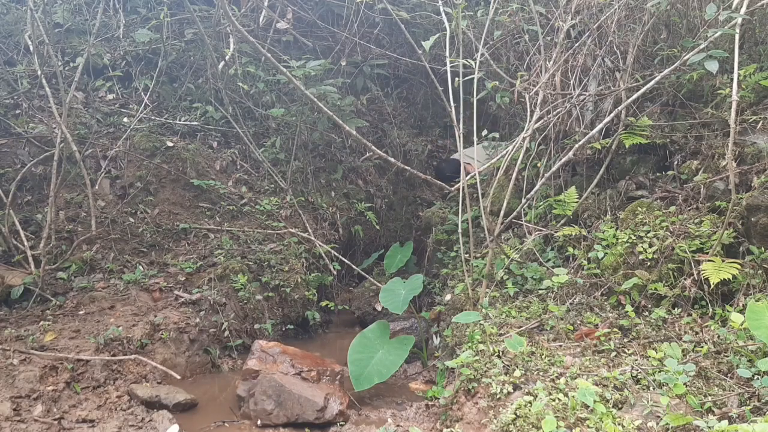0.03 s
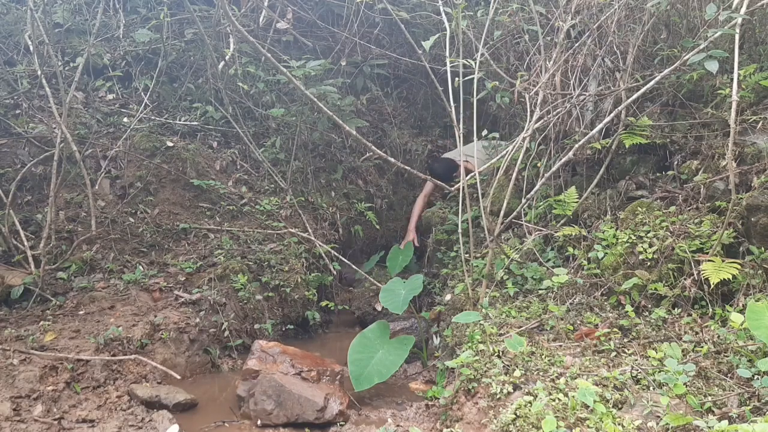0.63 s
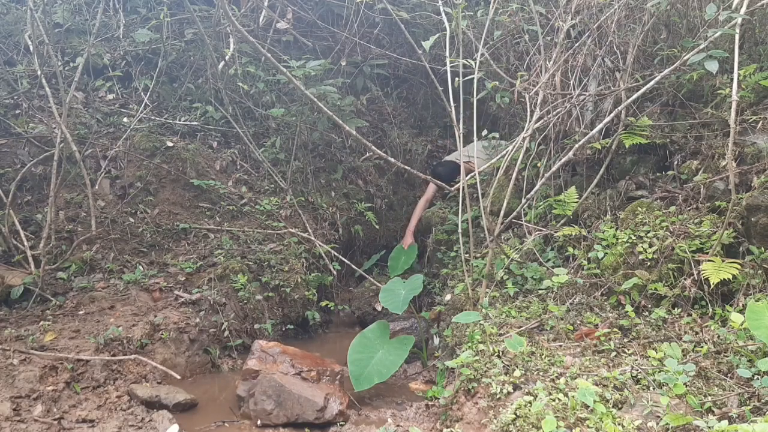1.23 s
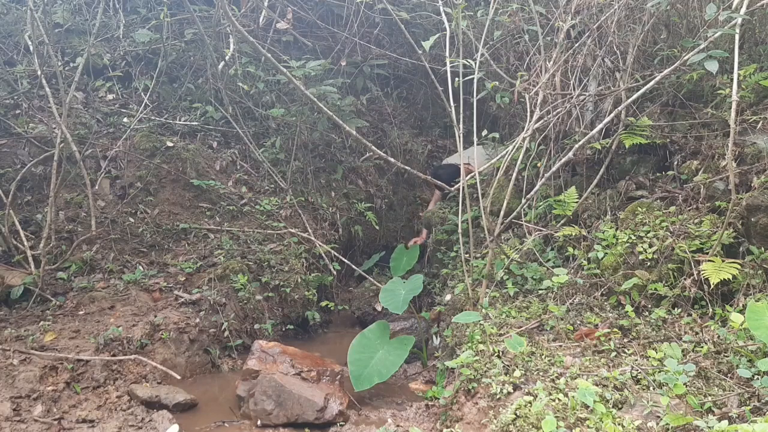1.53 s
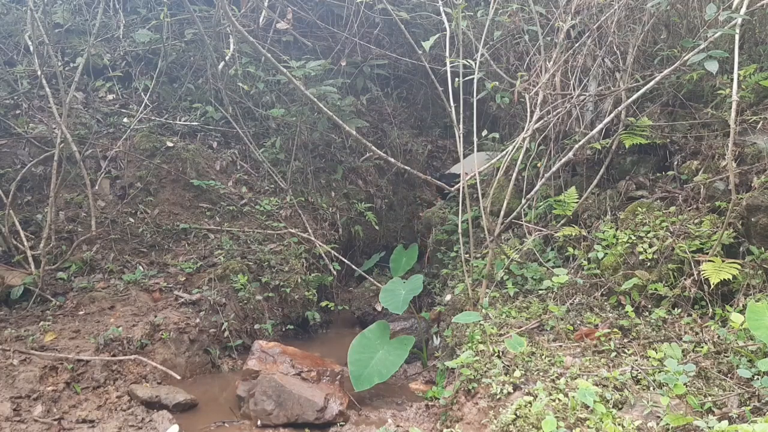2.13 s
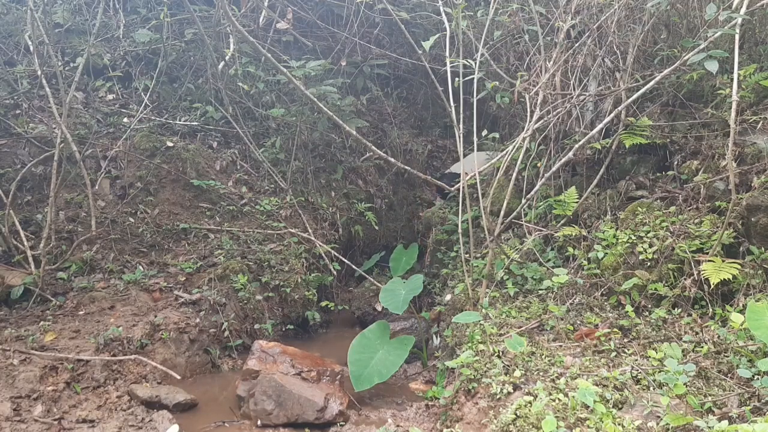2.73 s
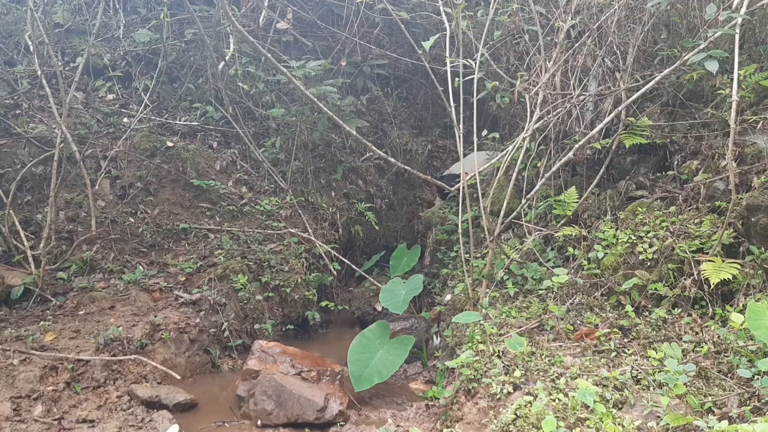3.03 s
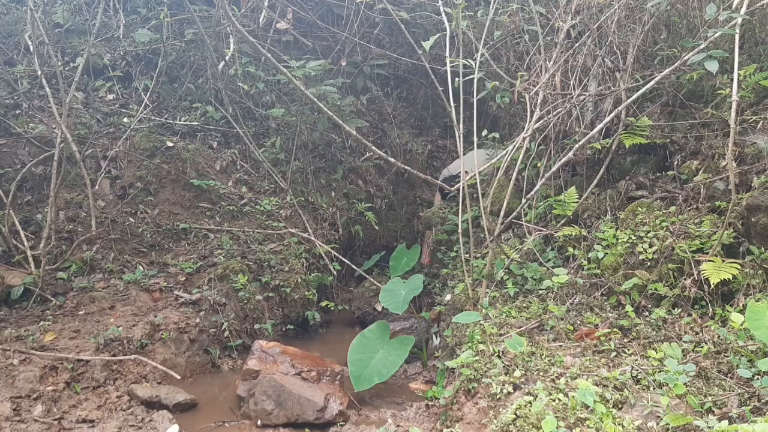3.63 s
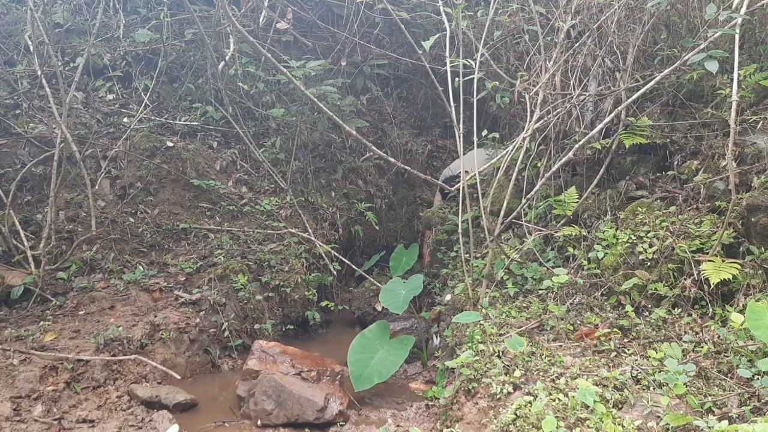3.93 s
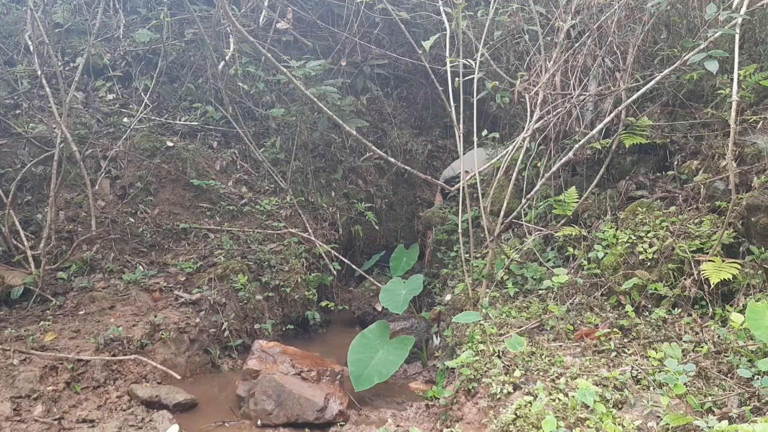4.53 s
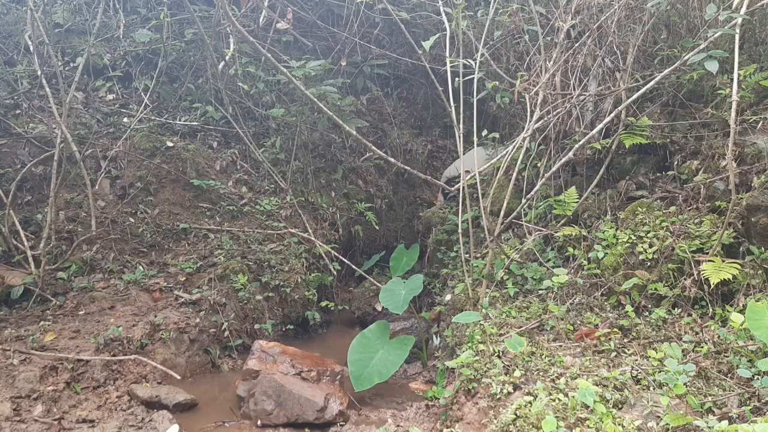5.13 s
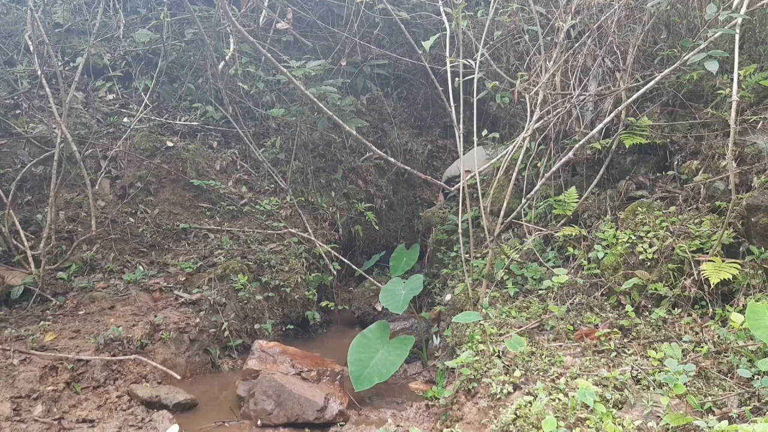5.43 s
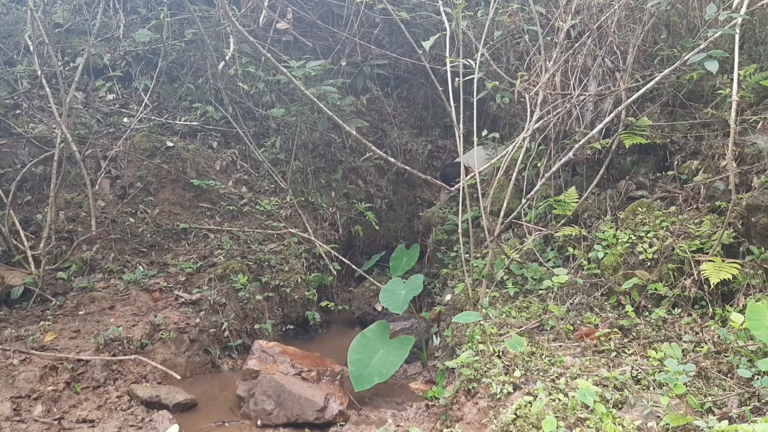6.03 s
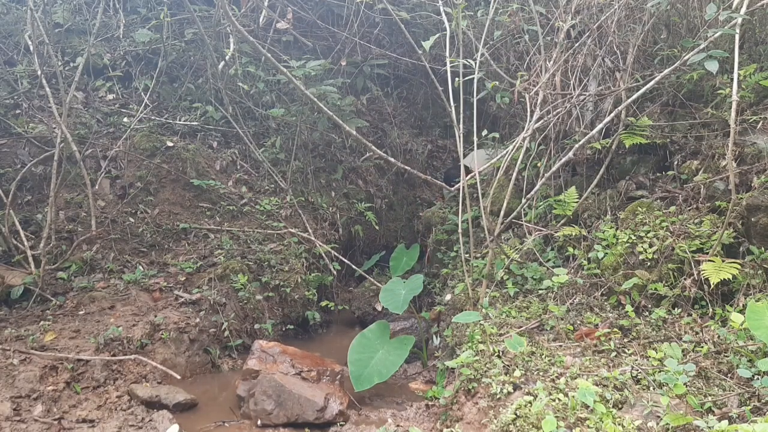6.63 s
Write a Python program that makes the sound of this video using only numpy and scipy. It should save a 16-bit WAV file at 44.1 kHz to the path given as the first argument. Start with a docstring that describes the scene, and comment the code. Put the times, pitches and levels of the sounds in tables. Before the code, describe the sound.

The sound opens in a forest gully with soft wet bumps close to the microphone. At about 0.6 and 0.8 seconds come two splashes, by far the loudest events: heavy drops thud into mud, bubbles froth, spray patters on leaves and twigs snap. The water settles by 1.4 seconds. Faint leaf brushes and twig ticks recur, around 2.3, 4.4 and 6.4 seconds.

Throughout, insects buzz high and steady over an even hiss, with rasps pulsing about four times a second and a cricket trilling in bouts. A thin brook bubbles quietly on the right, with scattered small plops. A few very faint, distant bird whistles come mostly between 1.4 and 2.2 seconds. A low, far engine drone on the right swells near 4 seconds, then rises slightly in pitch as it fades. The insects and brook continue to the end, just before 7 seconds.

```python
"""Water and wet earth splash twice among the leaves, close to the microphones, as someone reaches down.
Heavy drops thud into mud, bubbles froth and spray patters out; soft bumps and twig snaps lie around it.
The place is a forest gully: a thin brook bubbles to the right, and insects buzz and trill with their wings.
Far off, an engine drones and a few birds whistle faintly through the hiss of the forest."""
import sys
import numpy as np
from scipy import signal
from scipy.fft import rfft, irfft
from scipy.io import wavfile
from scipy.ndimage import uniform_filter1d

SR = 44100
rng = np.random.default_rng(int(sys.argv[2]) if len(sys.argv) > 2 else 0)


def unload_wav(signal):
    """Save mono or channel-first audio to the path in sys.argv[1] as 16-bit WAV at rate SR, clipped to [-1, 1]."""
    wavfile.write(
        sys.argv[1],
        SR,
        np.round(np.clip(np.atleast_2d(signal).T, -1, 1) * 32767).astype(np.int16),
    )


N = 298557
T = np.arange(N) / SR
HZ = np.fft.rfftfreq(N, 1 / SR)


def gain_of(db):
    """Decibels to amplitude."""
    return 10 ** (np.asarray(db) / 20)


def unit_rms(x):
    """Scales to rms 1."""
    return x / np.sqrt(np.mean(x ** 2) + 1e-20)


def over_frequency(points):
    """A table's value at every frequency, interpolated on a log axis."""
    hz, value = np.transpose(points)
    return np.interp(np.log(HZ + 1), np.log(hz + 1), value)


def over_time(rows):
    """A table's value at every sample."""
    return np.interp(T, *np.transpose(rows))


def colour(x, spectrum):
    """Filters x by a spectrum that falls away steeply beyond its ends; the result has rms 1."""
    low_cut = 1 + (spectrum[0][0] / (HZ + 1) / 1.2) ** 8
    high_cut = 1 + (HZ / spectrum[-1][0] / 1.2) ** 8
    return unit_rms(irfft(rfft(x) * gain_of(over_frequency(spectrum)) / high_cut / low_cut, N))


def drift(hz):
    """A random wander of rms 1, mostly slower than hz."""
    return unit_rms(irfft(rfft(rng.standard_normal(N)) * np.exp(-(HZ / hz) ** 2) * (HZ > 0), N))


def add(mix, s, sound):
    """Lays a sound into the mix at time s."""
    part = mix[max(round(s * SR), 0):][:len(sound)]
    part += sound[:len(part)]


def swells(rows, length_s):
    """An envelope that fades in and out around each (time [s], level [dB])."""
    out = np.zeros(N)
    for s, db in rows:
        add(out, s - length_s / 2, gain_of(db) * signal.windows.tukey(int(length_s * SR), .8))
    return out


def repeats(runs):
    """Spreads runs into single calls (time [s], level [dB])."""
    return [(s, db) for first, until, spacing, db in runs for s in np.arange(first, until, spacing)]


def impacts(per_s, spread_db):
    """A train of tiny impacts, most small and a few large."""
    out = np.zeros(N)
    at, size, sign = rng.random((int(per_s * N / SR), 3)).T
    out[(at * N).astype(int)] = np.sign(sign - .5) * gain_of(spread_db * np.minimum(-np.log(size), 4))
    return out


def mic_pair(x, likeness):
    """Shares two unrelated signals between the microphones, by (frequency [Hz], correlation)."""
    angle = np.arccos(np.clip(over_frequency(likeness), -1, 1)) / 2
    mid, side = rfft(x) * [np.cos(angle), np.sin(angle)]
    return irfft([mid + side, mid - side], N)


def from_right(x):
    """Sound from the right reaches the left microphone 20 samples later."""
    return np.array([np.roll(x, 20), x])


def gully(x, wet_db, t60):
    """Banks and stems scatter a short diffuse tail to each microphone."""
    t = T[:SR // 2]
    tail = rng.standard_normal((2, len(t))) * gain_of(-60 * t / t60) * (t > .003)
    return gain_of(wet_db) * signal.fftconvolve(x[None], tail / np.linalg.norm(tail[0]), axes=1)[:, :N]


# Forest hiss, all around: (frequency [Hz], relative level [dB])
AIR_SPECTRUM = [(20, -18), (80, 6.5), (200, -2.5), (400, -6), (700, -5.5), (1100, -5), (1700, -5.5),
                (2600, -4.5), (3400, -4), (4200, -.5), (5600, -3), (7200, -1), (9000, -3), (11000, -2),
                (13000, -6), (15500, -5.5)]

def forest_air():
    """An even hiss, alike at both microphones only in the bass."""
    hiss = colour(rng.standard_normal((2, N)), AIR_SPECTRUM)
    hiss = mic_pair(hiss, likeness=[(100, 0.81), (500, 0.23), (1200, 0.056), (4000, 0.0093)])
    return hiss * gain_of(-56.5 + .45 * drift(4))


# Engine speed: (time [s], firing rate [Hz])
FIRING_RATE = [(0, 61.96), (1.5, 60.3), (2.3, 61.9), (3.3, 60.96), (3.8, 61.3), (4.5, 61.44), (5.05, 63.2),
               (5.5, 65.4), (5.9, 66.1), (6.3, 68.8), (6.77, 69.2)]
# Its drone as heard, far off to the right, rising and falling and dipping deeply during the splash: (time [s],
# level [dB])
DRONE_LEVEL = [(0.0, -63), (0.07, -55.5), (0.3, -59), (0.45, -73), (0.6, -57), (0.71, -80), (1.11, -78),
               (1.28, -64.5), (1.51, -55), (1.62, -66), (1.83, -62), (2.15, -71), (2.92, -68), (3.0, -61.5),
               (3.85, -48.5), (5.35, -53), (5.47, -56.5), (6.09, -58.5), (6.11, -62.5), (6.56, -66),
               (6.6, -58), (6.77, -70)]
# Its rumble: (frequency [Hz], relative level [dB])
RUMBLE_SPECTRUM = [(20, -26), (45, -5), (70, -4), (120, 0.5), (160, -10), (260, -16), (500, -37)]

def far_engine():
    """Only the firing tone and a rumble carry this far; it runs rougher and less evenly as it speeds up."""
    firing_hz = over_time(FIRING_RATE)
    phase = 2 * np.pi * np.cumsum(firing_hz) / SR
    tone = np.sqrt(2) * (np.sin(phase) + gain_of(-20.5) * np.sin(2 * phase)) * gain_of(.5 * drift(28))
    rumble_db = -12 + 0.93 * (firing_hz - 62)
    rumble = gain_of(rumble_db) * colour(rng.standard_normal(N), RUMBLE_SPECTRUM)
    waver_db = 0.87 + 0.23 * (firing_hz - firing_hz[0])
    return from_right((tone + rumble) * gain_of(over_time(DRONE_LEVEL) + waver_db * drift(8.8)))


# Birds, far right: (time [s], length [s], start pitch [Hz], end pitch [Hz], relative level [dB])
BIRD_NOTES = [(0.263, 0.14, 1995, 1860, -71), (1.405, 0.086, 2400, 2387, -64.5),
              (1.559, 0.11, 2305, 2300, -67.5), (1.97, 0.069, 6220, 6580, -58),
              (2.12, .04, 6830, 6950, -59.5), (5.648, 0.082, 2350, 2110, -70)]

def far_birds():
    """Thin wavering whistles blurred by the trees."""
    out = np.zeros(N)
    for s, length, start_hz, end_hz, db in BIRD_NOTES:
        hz = np.linspace(start_hz, end_hz, int(length * SR))
        hz *= 1 + 0.0203 * drift(210)[:len(hz)]
        whistle = np.sin(2 * np.pi * np.cumsum(hz) / SR) * signal.windows.tukey(len(hz), .6)
        add(out, s, gain_of(db + 5.5) * whistle)
    return from_right(out) + gully(out, wet_db=-1.5, t60=0.25)


# High insect chorus, all around: (frequency [Hz], relative level [dB])
CHORUS_SPECTRUM = [(6800, -23), (7150, -11), (7500, -8), (7750, -4.5), (7930, 2.5), (8050, -9), (8250, -3),
                   (8500, -16)]
# It thins out, then returns: (time [s], level [dB])
CHORUS_SWELL = [(0, -57), (1.3, -60), (2, -71), (2.9, -65), (4, -60), (5.2, -57.5), (6.77, -57.5)]

def insect_chorus():
    """Many insects merge into one narrow band of hiss."""
    return colour(rng.standard_normal((2, N)), CHORUS_SPECTRUM) * gain_of(over_time(CHORUS_SWELL))


def wing_strokes(spectrum, throb_hz, depths):
    """Ringing wing strokes blur into a nearly even band that throbs; depths lists the throb's harmonics."""
    turns = np.cumsum(throb_hz * (1 + 0.0049 * drift(3.1))) / SR
    throb = sum(depth * np.cos(2 * np.pi * k * turns) for k, depth in enumerate(depths, 1))
    ring = colour(rng.standard_normal((2, N)), spectrum)
    strength = np.sqrt(uniform_filter1d(ring ** 2, size=1500, axis=1) + 1e-6)
    return unit_rms(ring / strength * np.exp(throb))


# Wing resonances of three insects, each (frequency [Hz], relative level [dB])
RASP_SPECTRUM = [(7100, -31), (7500, -6), (7750, -9.5), (7930, -5), (8080, -13), (8240, 0.5), (8400, -15),
                 (8650, -23)]
BUZZ_SPECTRUM = [(6150, -42), (6450, -3.5), (6620, 7.5), (6770, -12), (6860, 6), (6970, 2), (7300, -35)]
WHIRR_SPECTRUM = [(4250, -12), (4480, -5), (4600, 1), (4720, 5), (4950, -24)]
# Their runs of calls, each (first [s], until [s], spacing [s], level [dB])
RASP_CALLS = [(.12, .7, .25, -65), (1.03, 1.6, 0.257, -59.5), (1.78, 3.4, 0.251, -57.5),
              (3.56, 5.7, 0.249, -59), (6.14, 6.77, 0.31, -60)]
WHIRR_CALLS = [(1.21, 5.3, 1.213, -66.5)]

def insects():
    """In front of the chorus, wings make short high rasps, a steady fast buzz and long lower whirrs."""
    rasp = wing_strokes(RASP_SPECTRUM, throb_hz=66.7, depths=[.14])
    rasp *= swells(repeats(RASP_CALLS), length_s=0.29)
    buzz = wing_strokes(BUZZ_SPECTRUM, throb_hz=75.8, depths=[.19, .27, .14])
    buzz *= gain_of(-60 + .5 * drift(2.2))
    whirr = wing_strokes(WHIRR_SPECTRUM, throb_hz=57, depths=[.25])
    whirr *= swells(repeats(WHIRR_CALLS), length_s=0.97)
    return rasp + buzz + whirr


# The cricket's wing resonance: (frequency [Hz], relative level [dB])
CRICKET_SPECTRUM = [(3900, -21), (4130, -16), (4280, -16), (4350, 0), (4420, 4.5), (4500, -3.5),
                    (4700, -14.5)]
# Its bouts: (start [s], end [s], level [dB])
CRICKET_BOUTS = [(0, 1.3, -65), (1.8, 3.4, -69), (3.95, 5.72, -65.5), (6.35, 6.77, -66)]

def cricket(fade_s=.16, others_db=-69.5):
    """A cricket's wings trill in bouts; others farther off carry on faintly in the rests."""
    bouts = sum(gain_of(db) * np.clip(np.minimum(T - start, end - T) / fade_s + .5, 0, 1)
                for start, end, db in CRICKET_BOUTS)
    trill = wing_strokes(CRICKET_SPECTRUM, throb_hz=18.5, depths=[.42, 0, .22])
    return trill * np.hypot(bouts, gain_of(others_db))


def bubble(hz, cycles, rise):
    """An air pocket rings and sharpens as it nears the surface, dying by 60 dB over its cycles."""
    age = np.arange(int(SR * cycles / hz)) * hz / SR / cycles
    ring = np.sin(2 * np.pi * cycles * (age + rise * age ** 2))
    return ring * gain_of(-60 * age) * (1 - np.exp(-age * 30))


def bubble_swarm(lo_hz, hi_hz, per_s, spread_db, cycles, sizes):
    """Bubbles of many sizes, each size bursting per_s times a second."""
    rings = [bubble(hz, cycles, rise=0.08) * np.sqrt(hz) for hz in np.geomspace(lo_hz, hi_hz, sizes)]
    return sum(signal.oaconvolve(impacts(per_s, spread_db), ring)[:N] for ring in rings)


def eddies(patchy_db=8.5, sizes=9):
    """Each size of eddy hisses in its own band and comes and goes on its own."""
    out = np.zeros(N)
    for hz in np.geomspace(450, 4000, sizes):
        eddy = signal.lfilter(*signal.iirpeak(hz, 4, fs=SR), rng.standard_normal(N))
        out += eddy * gain_of(patchy_db * np.clip(drift(8.4), -2, 2))
    return out


# The brook, right of the microphones: (frequency [Hz], relative level [dB])
BROOK_SPECTRUM = [(200, -26), (430, -5.5), (600, 3.5), (850, -8), (1330, 0), (2200, -6), (3000, -4.5),
                  (5000, -7), (12000, -40)]
# Its clearest bubbles: (time [s], relative level [dB], pitch [Hz])
BROOK_PLOPS = [(1.253, -55, 600), (1.332, -54.5, 1040), (1.413, -52, 1480), (2.47, -54.5, 2150),
               (2.929, -55.5, 583), (3.21, -53.5, 1640), (3.369, -54, 650), (3.46, -50, 1310),
               (3.777, -53, 2120), (4.08, -48.5, 1500), (4.459, -50.5, 796), (4.5, -52.5, 567),
               (4.867, -64, 1930), (5.145, -50, 1660), (5.364, -47, 1100), (5.522, -48, 857),
               (6.229, -54, 1330), (6.264, -55, 1438), (6.393, -55, 1664), (6.449, -53.5, 765),
               (6.532, -51.5, 563), (6.599, -50.5, 890)]

def brook(lesser_count=5, swell_s=0.18):
    """Bubbles trickle over small eddies; each clear plop sheds lesser bubbles as the flow swells."""
    plops = np.zeros(N)
    for s, db, hz in BROOK_PLOPS:
        add(plops, s, gain_of(db) * bubble(hz, cycles=42, rise=.06))
        for late, pitch in rng.random((lesser_count, 2)):
            lesser_hz = hz * np.exp(0.176 * (2 * pitch - 1))
            add(plops, s + 0.045 * late, gain_of(db - 8) * bubble(lesser_hz, cycles=11, rise=0.056))
    trickle = bubble_swarm(720, 3000, per_s=2.2, spread_db=2.5, cycles=48, sizes=48)
    gurgle = colour(trickle, BROOK_SPECTRUM) * gain_of(-2)
    wash = colour(eddies(), BROOK_SPECTRUM) * gain_of(-2.5)
    steady_flow = gain_of(-69.5 + 2.3 * drift(7.8))
    surges = swells([(s + swell_s / 10, db - 19.5) for s, db, hz in BROOK_PLOPS], swell_s)
    water = (gurgle + wash) * np.hypot(steady_flow, surges) + gain_of(4.5) * plops
    return from_right(water) + gully(water, wet_db=-2.5, t60=0.12)


# Leaves ticking under spray or a touch: (frequency [Hz], relative level [dB])
TICK_SPECTRUM = [(2500, 0), (3800, -0.5), (5000, -4), (7000, -3), (9000, -6.5), (12000, -5.5),
                 (15500, -8.5)]

def leaf_ticks(per_s, spread_db):
    """Tiny bright impacts on leaves, a separate train for each side."""
    return colour([impacts(per_s, spread_db) for side in "LR"], TICK_SPECTRUM)


# The arm brushing nearby leaves: (middle [s], level [dB])
LEAF_BRUSHES = [(1.4, -60.5), (2.3, -58.5), (3.8, -66), (4.43, -59), (6.43, -62)]

def brushed_leaves():
    """Each brush gives a short clump of ticks."""
    return leaf_ticks(per_s=4000, spread_db=3) * swells(LEAF_BRUSHES, length_s=0.15)


# Twigs and leaves snapping, centred: (time [s], relative level [dB], pitch [Hz])
TWIG_SNAPS = [(.481, -46, 3220), (0.6, -35.5, 2070), (.787, -33.5, 2470), (.946, -40.5, 1890),
              (1.023, -46.5, 1830), (1.054, -49, 2700), (1.131, -42, 6500), (2.069, -52, 990),
              (2.55, -58, 12000), (3.091, -59, 5530), (3.794, -54, 5500), (4.867, -52.5, 3200),
              (5.346, -64, 5000), (5.774, -57, 10950)]

def twig_snaps(t60=0.012):
    """Brief cracks, each coloured by its own twig or leaf."""
    out, t = np.zeros(N), T[:SR // 20]
    for s, db, hz in TWIG_SNAPS:
        burst = rng.standard_normal(len(t)) * gain_of(-60 * t / t60)
        crack = signal.lfilter(*signal.iirpeak(hz, 2.5, fs=SR), burst)
        add(out, s, gain_of(db + 7) * crack / abs(crack).max())
    return out + gully(out, wet_db=1.5, t60=0.14)


# Wet slaps and soft bumps, close and centred: (time [s], level [dB], pitch [Hz], ring t60 [s])
WET_SLAPS = [(0.026, -43.5, 370, 0.037), (0.081, -40.5, 187, 0.03), (0.107, -48, 229, 0.14),
             (0.157, -45, 300, 0.024), (0.224, -43, 200, 0.024), (0.246, -39, 185, 0.043),
             (.256, -44.5, 470, 0.032), (.504, -39, 447, 0.048), (0.549, -34, 540, 0.045),
             (.574, -28, 625, 0.039), (.594, -21.5, 440, 0.015), (.6, -21.5, 425, 0.033),
             (0.622, -26.5, 395, 0.025), (.641, -32, 406, 0.03), (.66, -29.5, 470, 0.023),
             (0.7456, -19, 410, 0.027), (0.765, -34, 273, 0.083), (.786, -29.5, 444, 0.071),
             (0.808, -24.5, 493, 0.049), (.835, -25.5, 387, 0.027), (.878, -26.5, 600, 0.041),
             (.926, -43, 430, 0.09), (1.039, -51, 427, 0.068), (2.07, -47, 324, 0.034)]

def wet_slaps(smack=0.36, smack_t60=0.067, rise_s=0.0013):
    """A lump of water drives a short hollow ring with a burst of noise; larger lumps sound duller."""
    out, t = np.zeros(N), T[:SR // 6]
    for s, db, hz, t60 in WET_SLAPS:
        ring = np.sin(2 * np.pi * hz * t) * gain_of(-60 * t / t60)
        band = signal.butter(3, [hz / 2, hz * 1.97], "band", fs=SR, output="sos")
        burst = unit_rms(signal.sosfilt(band, rng.standard_normal(len(t)))) * gain_of(-60 * t / smack_t60)
        add(out, s, gain_of(db) * (ring + smack * burst) * (1 - np.exp(-t / rise_s)))
    return out + gully(out, wet_db=-18, t60=0.22)


# Throws of water, from first stirring to last patter:
# (peak time [s], build-up [s], mud level [dB], froth level [dB], spray level [dB])
WATER_THROWS = [(.11, 0.1, -60, -66, -59.5), (.26, 0.15, -62.5, -79, -72),
                (.505, 0.045, -55.5, -55.5, -47.5), (.563, 0.042, -35.5, -44.5, -43),
                (.603, 0.021, -37.5, -42, -39), (.76, 0.053, -46.5, -46, -42.5),
                (.8, 0.027, -36.5, -42.5, -42.5), (.855, 0.024, -52, -60, -48),
                (1.04, 0.045, -74, -60, -53.5)]

def throws(part, lapping_db, lag, rise, fall_db_per_s):
    """One part's envelope: throws build and die over soft lapping; lag and rise count in build-ups."""
    column = ["mud", "froth", "spray"].index(part)
    power = np.full(N, gain_of(lapping_db) ** 2)
    for s, build_s, *levels in WATER_THROWS:
        t = T - s - lag * build_s
        below_peak_db = np.where(t < 0, 20 * (t / (rise * build_s)) ** 2, fall_db_per_s * t)
        power += gain_of(levels[column] - below_peak_db) ** 2
    return np.sqrt(power)


# Thudding mud and frothing bubbles, each (frequency [Hz], relative level [dB])
MUD_SPECTRUM = [(70, -12.5), (150, -12.5), (210, -1.5), (290, -7), (420, 1), (620, -3), (800, -5),
                (1050, -25), (1400, -15.5)]
FROTH_SPECTRUM = [(900, -18.5), (1300, -5.5), (1600, -2.5), (2100, 2.5), (2600, -6.5), (3300, -17)]
# How alike the close splash is at the two microphones: (frequency [Hz], correlation [0-1])
SPLASH_LIKENESS = [(60, .99), (700, 0.95), (1200, 0.7), (2200, 0.98), (3500, 0.41), (6000, 0.21),
                   (8000, 0.14), (15000, 0)]

def splash(still_s=1.41, settle_s=0.17):
    """Heavy drops thud into mud, bubbles froth and spray rattles on leaves until the pool lies still."""
    mud = colour([impacts(per_s=1600, spread_db=1.5) for side in "LR"], MUD_SPECTRUM)
    mud *= throws("mud", lapping_db=-69.5, lag=0.028, rise=1.0, fall_db_per_s=121)
    swarms = [bubble_swarm(900, 3400, per_s=55, spread_db=2, cycles=32, sizes=24) for side in "LR"]
    froth = colour(swarms, FROTH_SPECTRUM)
    froth *= throws("froth", lapping_db=-69, lag=0.11, rise=1.5, fall_db_per_s=82)
    spray = leaf_ticks(per_s=6000, spread_db=2.5)
    spray *= throws("spray", lapping_db=-67, lag=.12, rise=1.43, fall_db_per_s=98)
    settling = np.clip((still_s - T) / settle_s, 0, 1)
    return mic_pair((mud + froth + spray) * settling, SPLASH_LIKENESS)


def scene():
    """The gully as heard from beside the pool."""
    near = splash() + wet_slaps() + twig_snaps() + brushed_leaves()
    around = brook() + insects() + cricket() + insect_chorus()
    far = far_birds() + far_engine() + forest_air()
    return near + around + far


def record(dry, cutoff_hz=15520):
    """A microphone pair, the left more sensitive, with a steep cut of the highest treble."""
    mics = dry * gain_of([[1.4], [-1.7]])
    lowpass = signal.firwin(1023, cutoff_hz, window=("kaiser", 9), fs=SR)
    return signal.oaconvolve(mics, lowpass[None], "same")


dry = scene()
out = record(dry)
unload_wav(out)
```